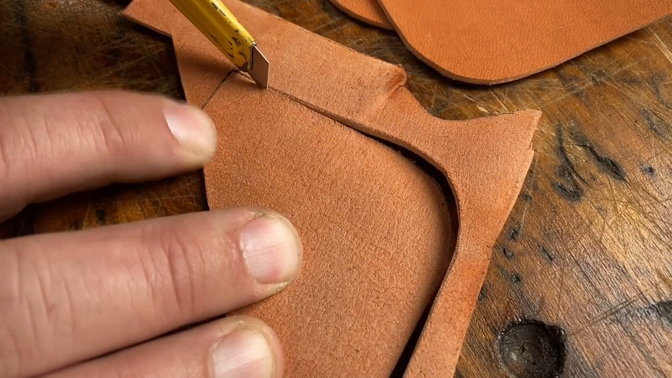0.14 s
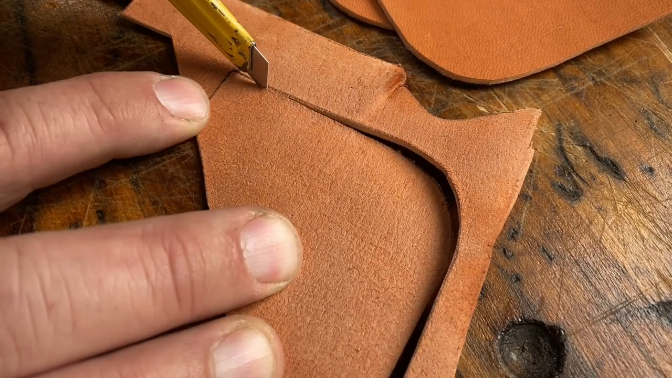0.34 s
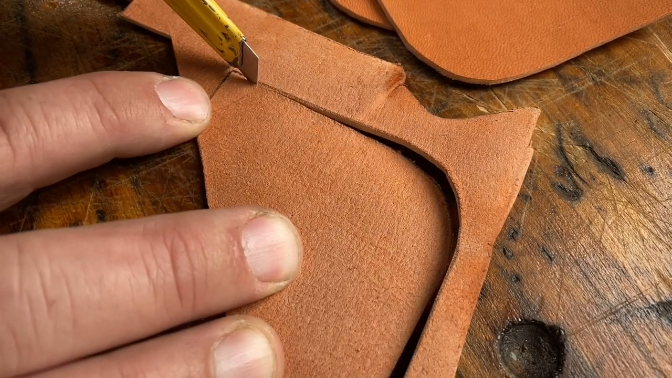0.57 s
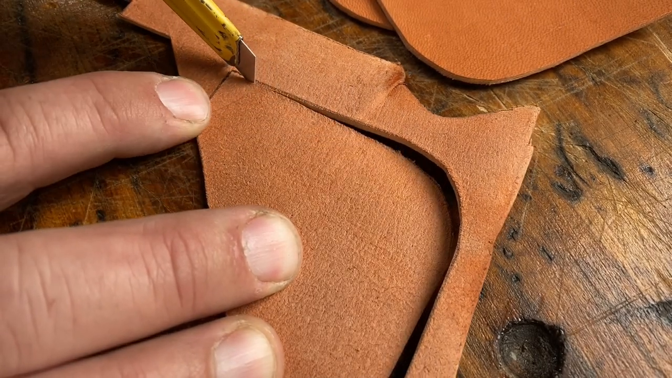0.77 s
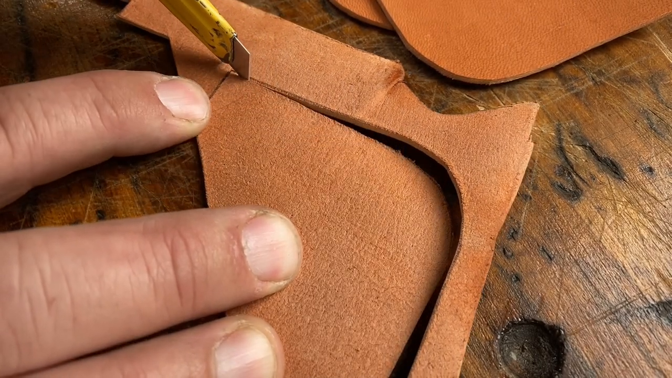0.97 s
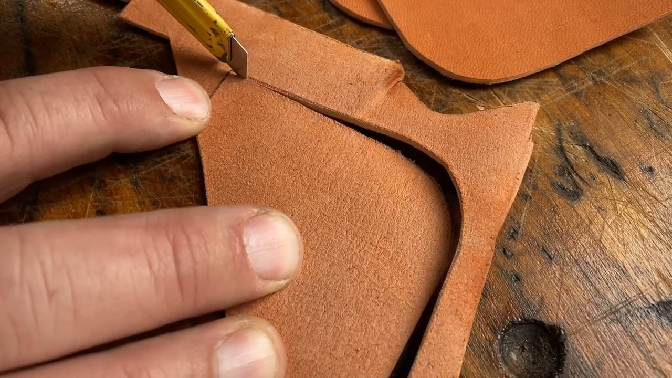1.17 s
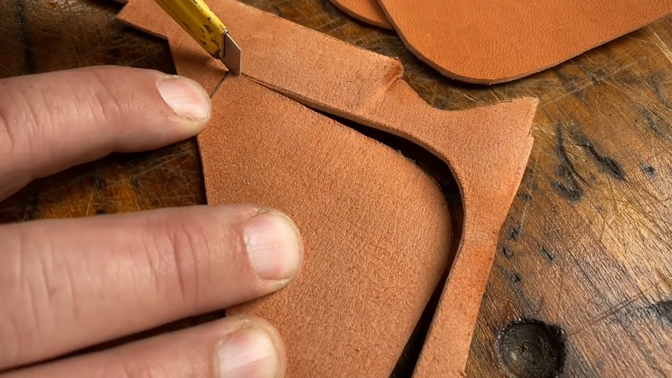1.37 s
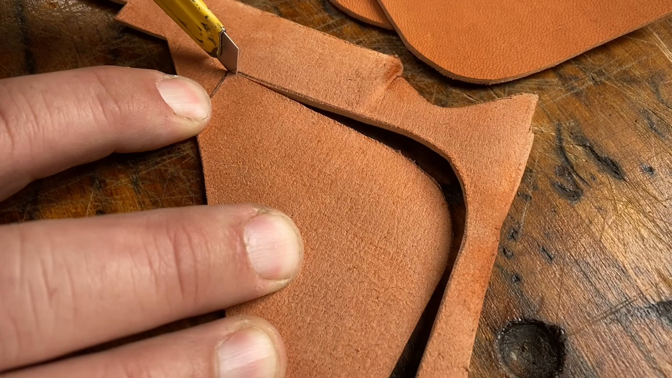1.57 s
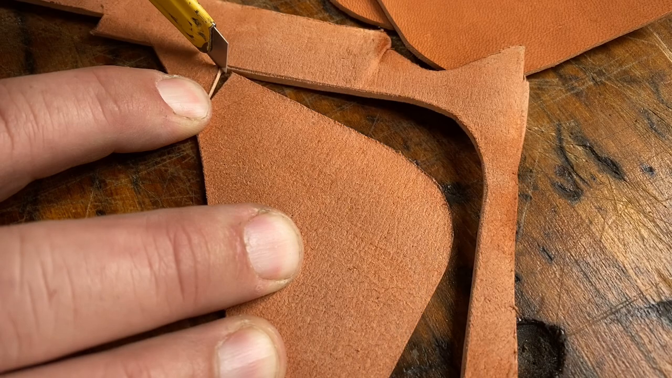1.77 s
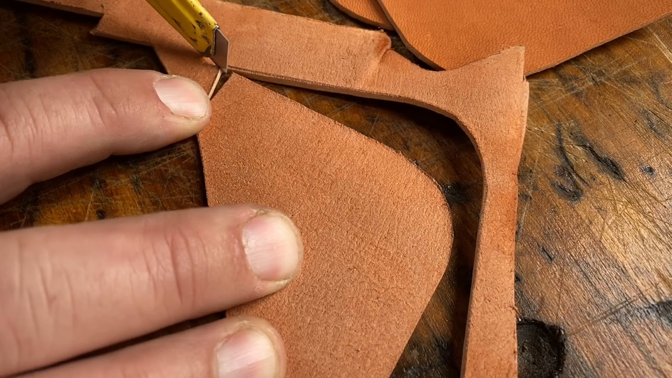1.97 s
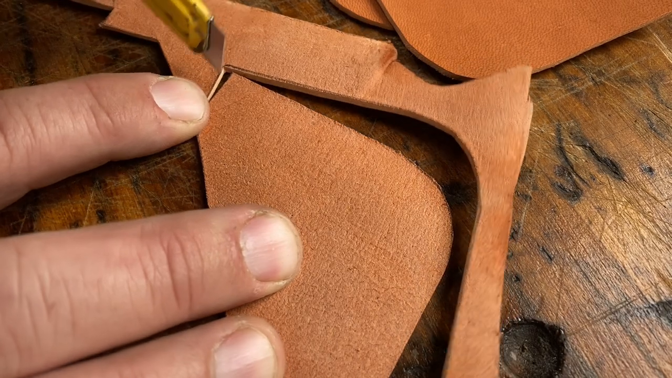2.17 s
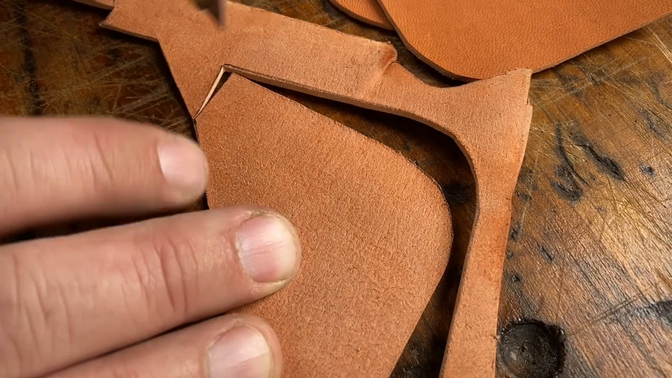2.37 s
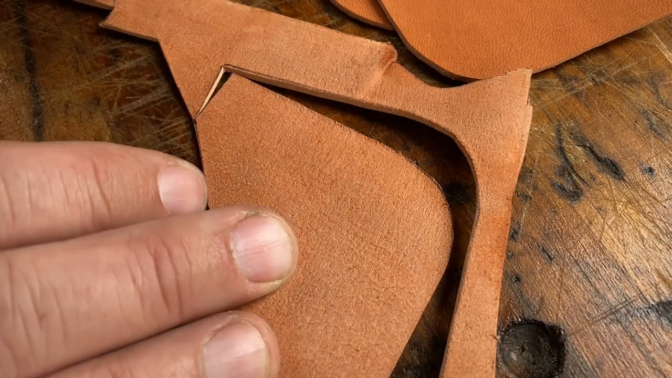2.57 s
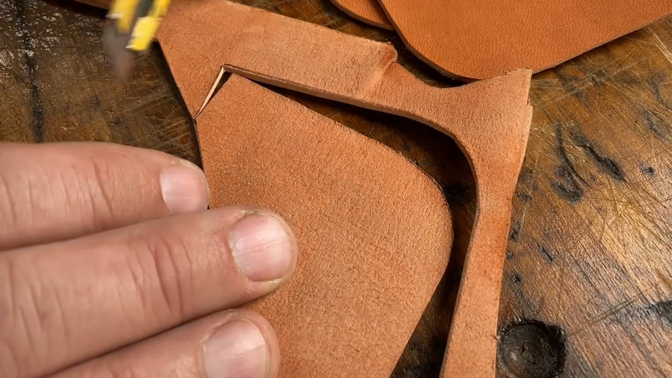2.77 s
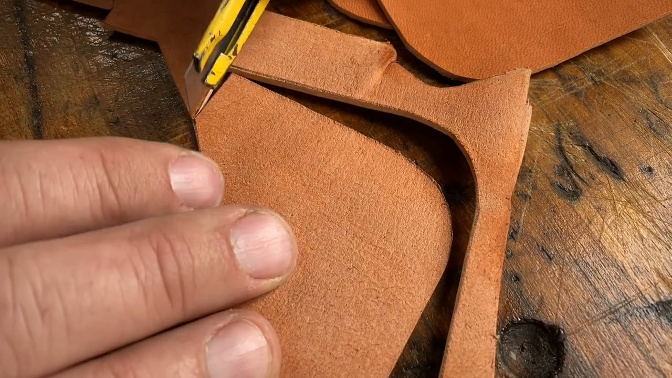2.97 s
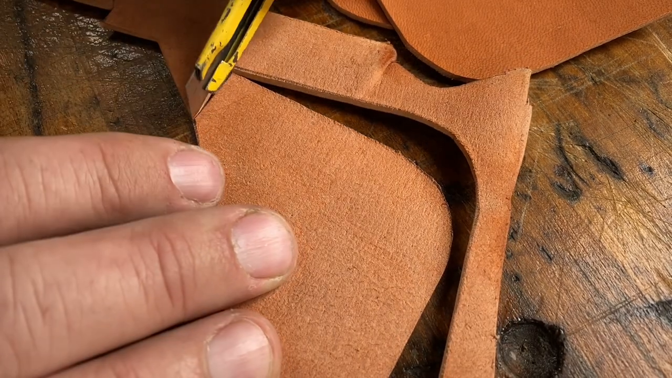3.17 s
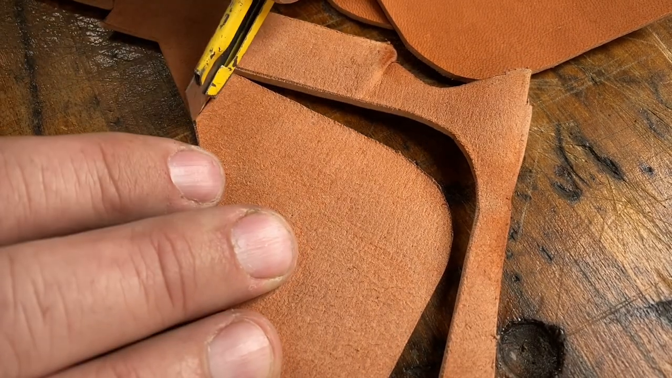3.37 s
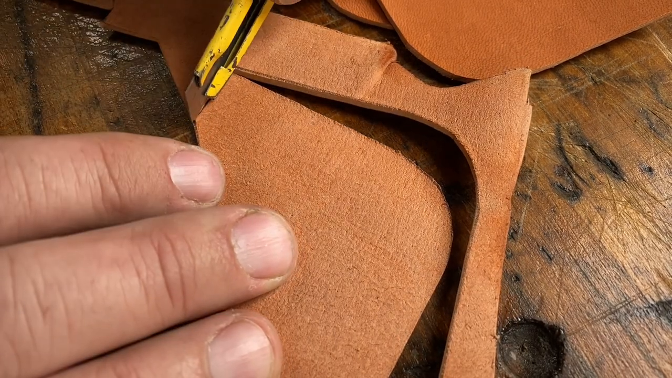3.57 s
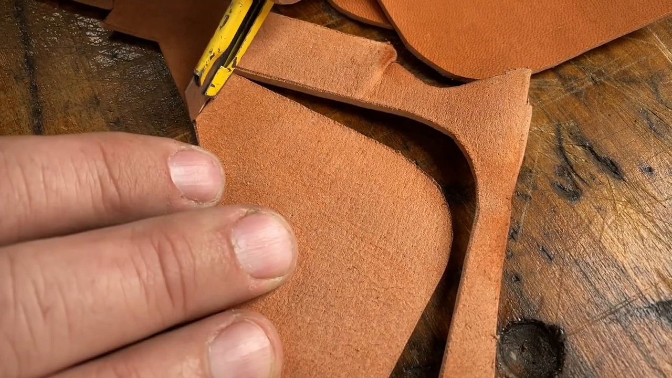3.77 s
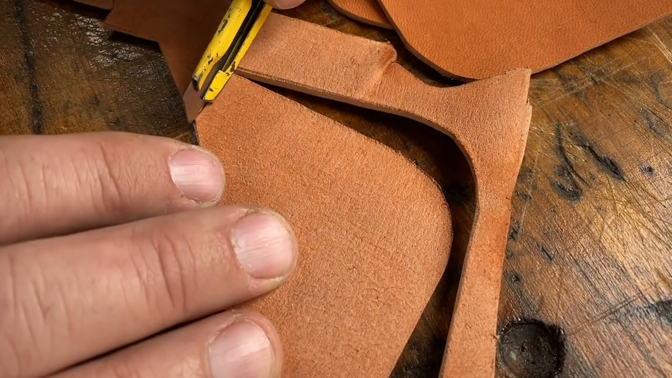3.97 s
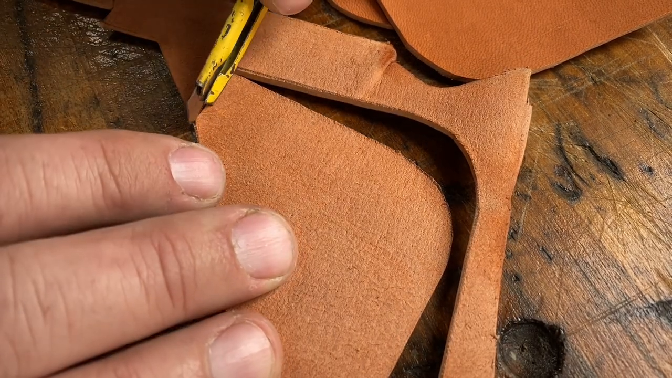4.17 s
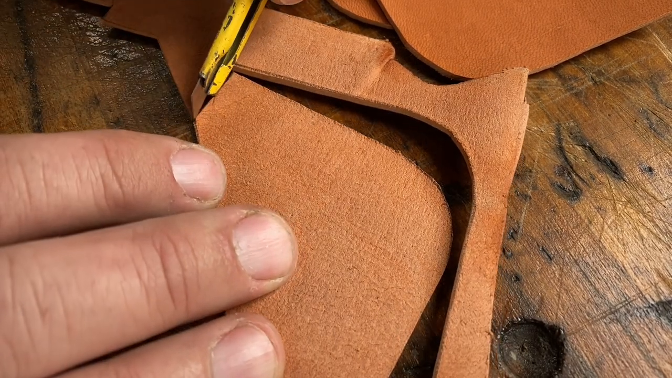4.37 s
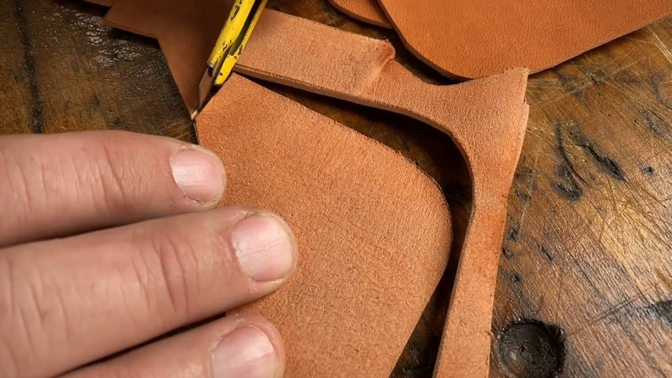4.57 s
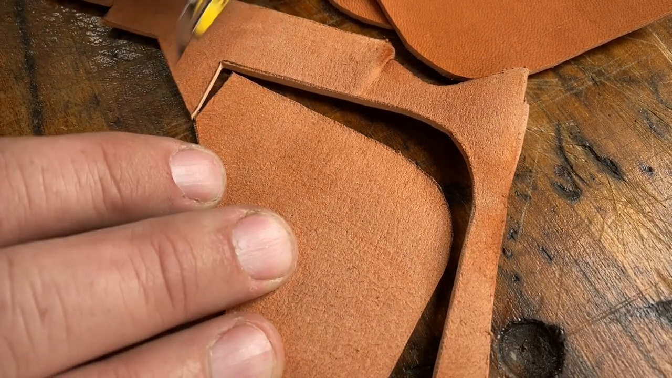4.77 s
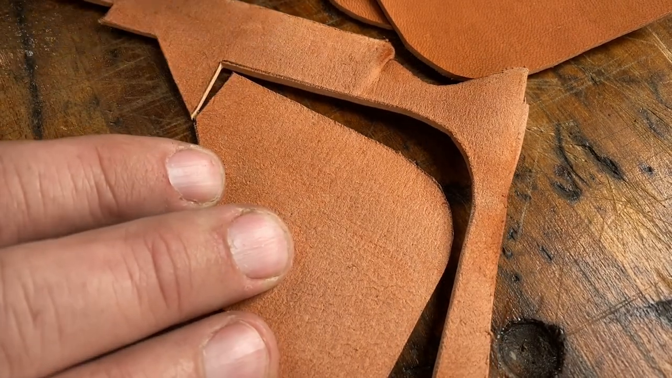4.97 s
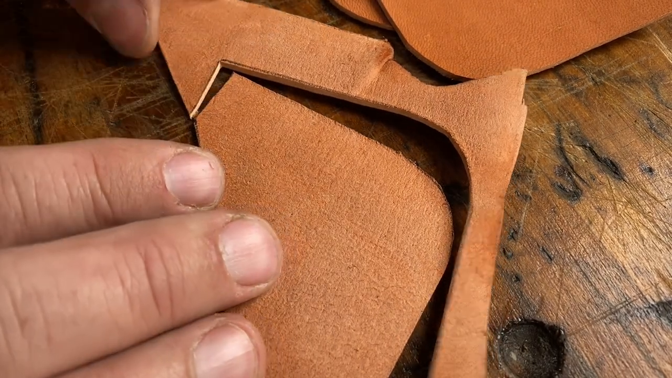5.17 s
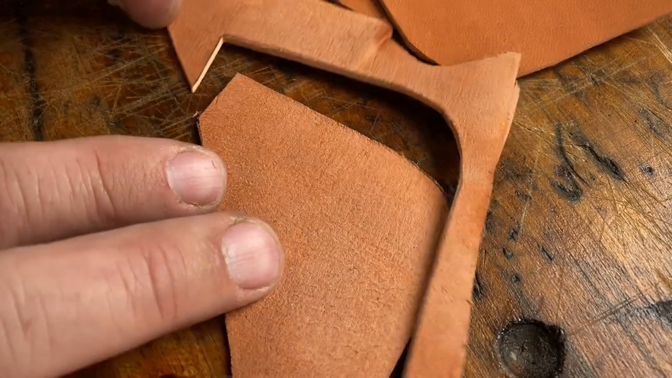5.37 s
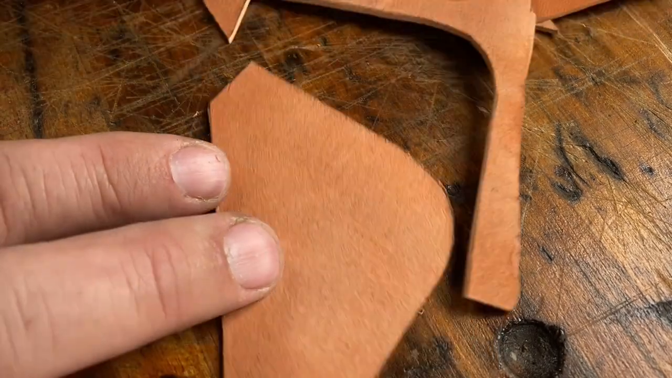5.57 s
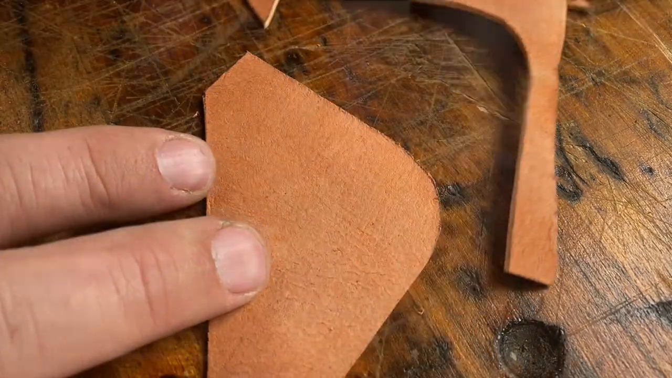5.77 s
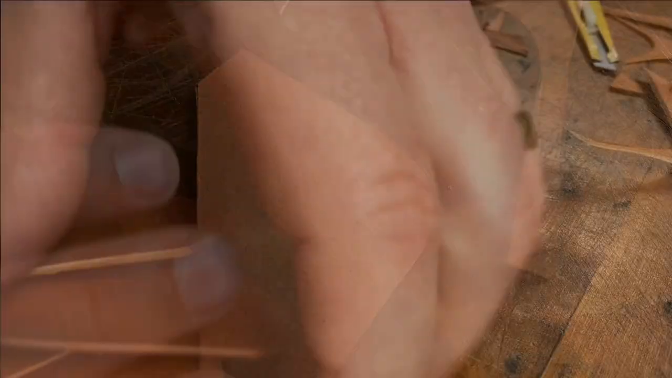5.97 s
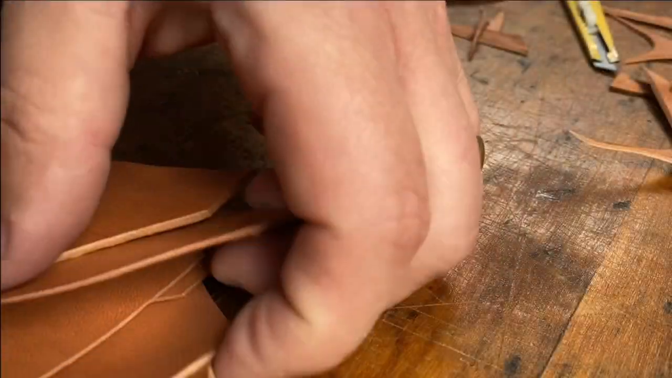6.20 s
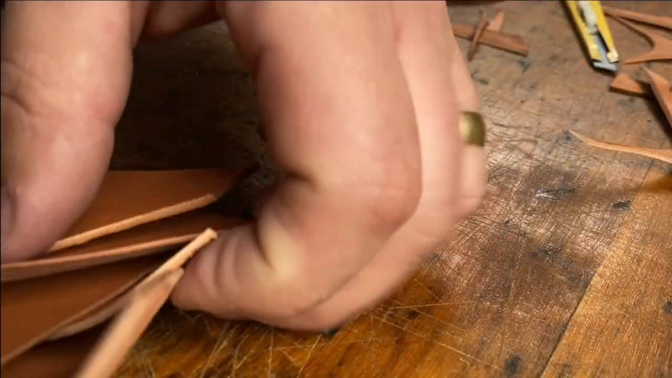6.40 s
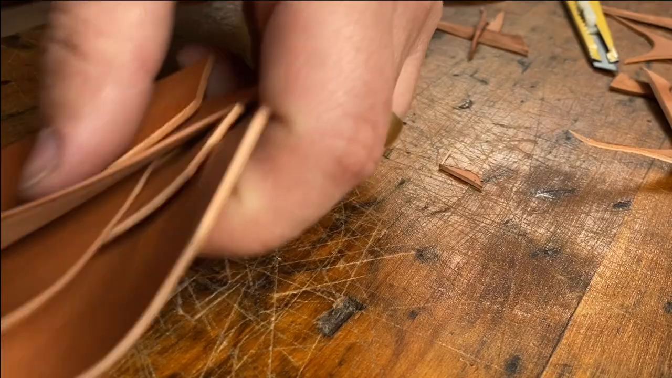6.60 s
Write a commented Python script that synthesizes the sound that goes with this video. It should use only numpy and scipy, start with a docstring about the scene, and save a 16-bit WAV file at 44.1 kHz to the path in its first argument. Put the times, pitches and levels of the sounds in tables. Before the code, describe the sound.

Short crisp knife slices through leather, a sharp tip snap, bright blade clicks and ratchet, a second cut, then leather dragged and gathered.

```python
"""Cutting leather with a snap-off knife

Short slicing strokes through leather on a wooden bench: clumped slips and snags ring the material.
The blade tip snaps through, the knife clicks as it is turned in the hand, and a second cut frees the piece;
blows ring damped modes. The offcut is dragged away and the pieces are gathered, as shaped friction noise.
A small room adds echoes and a short tail, over steady noise and a low, wavering tone.
"""
import sys
import numpy as np
from scipy import signal
from scipy.fft import rfft, irfft
from scipy.io import wavfile

SR = 44100
rng = np.random.default_rng(int(sys.argv[2]) if len(sys.argv) > 2 else 0)


def output_pcm(signal):
    """Save a mono or channel-first signal as 16-bit PCM at the path in sys.argv[1].

    Samples are clipped to [-1, 1] before scaling.
    """
    pcm = np.clip(np.atleast_2d(signal).T, -1, 1) * 32767
    wavfile.write(sys.argv[1], SR, np.round(pcm).astype(np.int16))


N = 292824
TIME = np.arange(N) / SR
LN_60_DB = np.log(1000)


def amp(db):
    """Decibels to gain."""
    return 10 ** (np.asarray(db) / 20)


def unit(x):
    """Scales to rms 1."""
    return x / np.sqrt(np.mean(x ** 2) + 1e-20)


def read(points, hz):
    """Interpolates a table on a log-frequency axis."""
    f, value = np.transpose(points)
    return np.interp(np.log(hz + 1), np.log(f + 1), value)


def add(mix, start_s, sound):
    """Mixes a sound in, in place."""
    part = mix[round(start_s * SR):][:len(sound)]
    part += sound[:len(part)]


def colour(x, spectrum, size=4096):
    """Causal minimum-phase filter with the given spectrum."""
    hz = abs(np.fft.fftfreq(size, 1 / SR))
    log_gain = np.log(amp(read(spectrum, hz)))
    response = np.exp(np.conj(signal.hilbert(log_gain)))
    taps = np.fft.ifft(response).real[:size // 2]
    return signal.fftconvolve(x, taps)[:len(x)]


def shape_noise(gain):
    """Gaussian noise of rms 1 with the given gain per FFT bin."""
    return unit(irfft(rfft(rng.standard_normal(N)) * gain, N))


def drift(rate_hz):
    """Smooth random wander of rms 1, Gaussian low-pass."""
    return shape_noise(np.exp(-(np.fft.rfftfreq(N, 1 / SR) / rate_hz) ** 2))


def band(centre_hz, width_hz):
    """Noise of rms 1 in one steep resonance."""
    f = np.fft.rfftfreq(N, 1 / SR)
    return shape_noise(1 / (1 + (2 * (f - centre_hz) / width_hz) ** 2))


def strokes(rows, stretch=1):
    """Gain of strokes that rise and fall linearly in dB around a hold; powers add."""
    power = np.zeros(N)
    for s, db, rise, hold, fall, *_ in rows:
        before = np.maximum(s - TIME, 0) / rise
        after = np.maximum(TIME - s - hold, 0) / fall
        power += amp(db - 20 * (before + after) / stretch) ** 2
    return np.sqrt(power)


SNAGS_PER_S = 25


def friction(force, spectrum, slips_per_s, spread_db, clump_db, clump_hz, smooth_db, snag_db=22):
    """Uneven tiny slips plus smooth hiss, in clumps, and random fibre snags; all ring the rubbed body."""
    size_db = spread_db * np.minimum(rng.exponential(1, N), 4)
    slips = (rng.random(N) < slips_per_s / SR) * rng.choice([-1, 1], N) * amp(size_db)
    snags = (rng.random(N) < SNAGS_PER_S / SR) * rng.uniform(-0.94, 1, N)
    rubbing = unit(slips) + amp(smooth_db) * rng.standard_normal(N)
    drive = rubbing * amp(clump_db * drift(clump_hz)) + amp(snag_db) * snags
    return force * unit(colour(drive, spectrum))


def contact(x, rows, boost_db, width, patch_db):
    """Colours a rub with a hollow and treble fizz that glide between strokes, and with shifting patches."""
    hz, t, z = signal.stft(x, SR, nperseg=512, noverlap=384)
    start, _, _, hold, _, centre_hz, fizz_db = np.transpose(rows)
    middle_s = start + hold / 2
    offset = hz[:, None] / np.interp(t, middle_s, centre_hz) - 1
    hollow = 1 / (1 + (offset / width) ** 2)  # width: half-width / centre
    treble = np.clip((hz[:, None] - 6000) / 6000, 0, 1)
    smear = np.outer(np.hanning(9), np.hanning(21))
    patches = unit(signal.fftconvolve(rng.standard_normal(z.shape), smear, "same"))
    gain_db = boost_db * hollow + treble * np.interp(t, middle_s, fizz_db) + patch_db * patches
    shaped = signal.istft(z * amp(gain_db), SR, nperseg=512, noverlap=384)[1][:N]
    return np.std(x) * unit(shaped)


def ring(modes, pitch=1, hard_db_at_10khz=0, count=2048):
    """One blow on damped modes, peak 1; a harder contact favours the high ones."""
    t = np.arange(count) / SR
    wave = np.zeros(count)
    for k, (hz, width_hz, db) in enumerate(modes):
        gain = amp(db + hard_db_at_10khz * hz / 10000) * width_hz
        decay = np.exp(-np.pi * width_hz * t)
        wave += (-1) ** k * gain * decay * np.sin(2 * np.pi * hz * pitch * t)
    return wave / abs(wave).max()


def bursts(rows, spectrum, crack_db, count=4096):
    """Each event is a one-sample crack and a decaying noise crumble."""
    out, t = np.zeros(N), np.arange(count) / SR
    for (s, db, t60), noise in zip(rows, rng.standard_normal((len(rows), count))):
        crumble = noise * np.exp(-LN_60_DB * t / t60)
        wave = colour(crumble + amp(crack_db) * (t == 0), spectrum)
        add(out, s, amp(db) * wave / abs(wave).max())
    return out


# blade pushed through leather:
# (full force at [s], level [dB], rise [s per 20 dB], hold [s], fall [s per 20 dB])
PUSHES = [(.463, -51, 0.067, .005, 0.054), (.787, -53.5, .035, .042, .018), (1.26, -66, 0.28, .03, .06),
          (1.348, -52, 0.032, .004, 0.037), (1.48, -65.5, .06, 0.036, .025), (1.627, -41, .02, .022, 0.021),
          (1.838, -57.5, .035, .004, 0.086), (4.16, -68, 0.34, .06, .08), (4.36, -43, 0.048, 0.0064, 0.017),
          (4.535, -54.5, .014, .01, .03), (4.555, -47.5, 0.033, 0.026, 0.032)]
# spectra of first cut, second cut: (frequency [Hz], relative level [dB])
FIRST_SPECTRUM = [(200, -8), (1000, -10), (3000, -13), (5000, -12), (5700, -1), (6900, -6), (7900, 3),
                  (8800, -7), (9750, -15), (10600, -2), (12100, -13), (13400, -7), (15200, -4),
                  (16000, -11)]
SECOND_SPECTRUM = [(200, -2), (1000, -17), (2600, -17), (4300, -5.5), (5000, -11), (5400, -3), (6300, -3),
                   (7200, 1), (8300, -12), (9600, -11.5), (11400, -21), (13500, -10), (16000, -14)]
LEAN_DB, LEAN_STRETCH = -20, 4  # edge leaning on the fibres: fainter, slower swell around each push
TURNED_S = 3  # knife held the other way round from here


def cutting():
    """The edge parts fibres by slips and snags, in swelling pushes."""
    force = np.hypot(strokes(PUSHES), amp(LEAN_DB) * strokes(PUSHES, LEAN_STRETCH))
    first = friction(force * (TIME < TURNED_S), FIRST_SPECTRUM, slips_per_s=5000, spread_db=3,
                     clump_db=1.8, clump_hz=140, smooth_db=-1)
    second = friction(force * (TIME >= TURNED_S), SECOND_SPECTRUM, slips_per_s=5000, spread_db=2.6,
                      clump_db=1.4, clump_hz=140, smooth_db=0)
    return first + second


# small sharp ticks and creaks while cutting, gripping and dragging: (time [s], peak [dB], T60 [s])
TICKS = [(.138, -44.5, 0.084), (.830, -41, .008), (1.87, -43, .0087), (2.757, -32.5, .008),
         (2.794, -35.5, .013), (3.640, -42, .003), (3.753, -36.5, .0047), (3.907, -36.5, 0.0073),
         (4.16, -43, 0.042), (4.21, -36.5, .02), (4.226, -35, 0.017), (4.409, -38, 0.0065),
         (4.583, -28, .007), (4.654, -39, .011), (5.043, -33.5, 0.026), (5.523, -32, .004),
         (5.552, -32, .004), (5.7706, -29, .002)]
# tick spectrum: (frequency [Hz], relative level [dB])
TICK_SPECTRUM = [(200, -6), (2500, -7.5), (4500, -2), (7000, 0.5), (10000, -5), (12500, -4.5), (14500, -2),
                 (16000, -3.5)]


def ticks():
    """Small sharp ticks and creaks: a crack and a short noise decay each."""
    return bursts(TICKS, TICK_SPECTRUM, crack_db=8.5)


# blade tip snapping through, tapping the bench:
# (time [s], peak [dB], mode frequency factor [-], hardness [dB at 10 kHz])
SNAPS = [(1.631, -15.5, 1.02, -3.5), (1.637, -29.5, .95, 0), (1.645, -30, 1.02, 2), (1.681, -36.5, 1.06, 4),
         (1.768, -42, .9, -1), (4.5827, -30, 1.14, 11), (4.8715, -25.5, 0.977, -4), (5.934, -38.5, .7, -7)]
# blade knocking in its slider: (time [s], peak [dB], mode frequency factor [-])
CLACKS = [(2.028, -48, 1.04), (2.046, -9.5, 1.046), (2.0474, -18.5, 0.92), (2.5457, -35, 1.0),
          (2.5472, -32, 0.95), (2.5487, -32, 0.9), (3.4112, -41.5, 0.633), (3.412, -32, 0.95),
          (3.412, -37, 0.73)]
# slider slipping over its teeth: (time [s], peak [dB])
TEETH = [(2.3845, -15.5), (2.3856, -19.5), (2.3867, -15), (2.3888, -23)]
# modes of tip, slider, teeth: (frequency [Hz], width [Hz], level re width [dB])
TIP_MODES = [(1000, 430, -10.5), (1934, 260, -1.5), (2390, 305, 0.5), (2880, 370, -2), (3870, 380, -5.5),
             (4620, 460, -4), (5600, 340, 2), (7500, 570, -3), (8740, 540, -6.5), (10200, 900, -11),
             (13200, 800, -10), (14970, 520, -10)]
SLIDER_MODES = [(700, 900, -17.5), (1410, 780, -18), (3000, 300, -16.5), (3900, 120, -6.5),
                (4470, 220, -9.5), (5460, 170, -11), (6280, 290, 0), (7090, 600, 0), (7680, 520, 1.5),
                (7990, 430, -2), (11900, 700, -14), (13500, 1200, -19)]
TOOTH_MODES = [(1920, 1260, -15.5), (3700, 190, -6), (4420, 320, -4), (4910, 310, 2), (5760, 340, -4),
               (6990, 290, 2), (8770, 260, 1), (9600, 470, -7), (11360, 550, -11), (12400, 330, -7),
               (13350, 340, -1.5), (14100, 250, -7), (15350, 440, -9)]
# loose handle parts buzzing after a blow: (time [s], peak [dB], T60 [s])
BUZZES = [(2.048, -36, 0.15), (2.088, -42.5, .06), (2.389, -32.5, .16), (3.414, -45, 0.089)]
# fingers shifting on the handle: (full force at [s], level [dB], rise [s per 20 dB], hold [s],
# fall [s per 20 dB], resonance of hollow under hand [Hz], fizz from 12 kHz up [dB])
GRIPS = [(2.188, -69, .15, 0.052, .1, 5200, 11), (2.325, -56.5, 0.12, .03, .1, 3080, 8),
         (2.422, -55, .08, 0.057, .04, 3700, 4), (2.547, -42.5, 0.0033, .003, .005, 6500, 8),
         (2.632, -47, 0.012, 0.018, .035, 5600, 4.5), (2.72, -54, .1, .008, .04, 4970, 0),
         (2.757, -50, .025, .004, .02, 5500, 1), (2.793, -56, 0.027, .004, 0.028, 5600, 8),
         (2.85, -66.5, .15, .03, .15, 6000, 3), (2.926, -59.5, .06, .004, 0.036, 3880, 4),
         (2.972, -61, .05, .004, .05, 7050, 10)]
# handle spectrum: (frequency [Hz], relative level [dB])
GRIP_SPECTRUM = [(300, -25), (2000, -23.5), (3200, -12), (3900, -2.5), (5700, -2.5), (6900, -4), (8000, -6),
                 (9000, -10), (11500, -16), (14000, -15.5), (16000, -13)]


def knife():
    """Tip, loose blade and slider teeth ring as struck modes; fingers rub and loose parts buzz."""
    rub = friction(strokes(GRIPS), GRIP_SPECTRUM, slips_per_s=3000, spread_db=3.2,
                   clump_db=1.7, clump_hz=170, smooth_db=-1)
    out = contact(rub, GRIPS, boost_db=7.5, width=.12, patch_db=3)
    out += bursts(BUZZES, GRIP_SPECTRUM, crack_db=0, count=8192)
    for s, db, pitch, hard_db in SNAPS:
        add(out, s, amp(db) * ring(TIP_MODES, pitch, hard_db))
    for s, db, pitch in CLACKS:
        add(out, s, amp(db) * ring(SLIDER_MODES, pitch))
    for s, db in TEETH:
        add(out, s, amp(db) * ring(TOOTH_MODES))
    return out


# offcut nudged and pulled over the bench; pieces gathered, leather on leather and skin:
# (full force at [s], level [dB], rise [s per 20 dB], hold [s], fall [s per 20 dB],
# resonance [Hz], fizz from 12 kHz up [dB])
DRAGS = [(4.652, -48.5, .008, .003, 0.028, 3970, -2), (4.698, -57, .08, 0.018, 0.19, 3700, -2),
         (4.905, -58, 0.11, 0.043, .08, 3700, -2), (5.0, -62.5, .1, .13, .15, 5270, 0),
         (5.227, -55.5, .1, 0.12, .08, 5200, -3.5), (5.396, -49.5, 0.056, 0.083, .08, 3360, 2),
         (5.52, -42.5, .07, .018, 0.1, 3520, 0), (5.622, -54.5, .1, 0.067, .1, 3330, 1),
         (5.741, -46, .09, 0.046, .09, 5100, -0.5)]
GATHERS = [(5.93, -62, .1, 0.034, .08, 2000, -5), (5.996, -49.5, .035, .005, 0.064, 4550, 1.5),
           (6.087, -55.5, 0.13, 0.072, .12, 4440, 5), (6.228, -54, .12, .008, .1, 2690, -1.5),
           (6.312, -45, .03, .008, 0.039, 3720, -1), (6.36, -59.5, .05, .04, .05, 3600, 1),
           (6.417, -47, .016, .035, 0.22, 3200, -1.5), (6.556, -50, .02, .008, .08, 4200, 2),
           (6.613, -53, .1, .03, .1, 6000, 0.5)]
# piece edges flapping together: (time [s], peak [dB], T60 [s])
FLAPS = [(6.279, -32.5, .022), (6.2902, -27.5, .015), (6.299, -30.5, 0.016), (6.3062, -29.5, 0.02),
         (6.419, -38.5, .025), (6.547, -35.5, .015)]
# spectra of drag, gather, flaps: (frequency [Hz], relative level [dB])
DRAG_SPECTRUM = [(200, -7), (700, -4), (1600, -10), (2800, -6), (3450, -2), (4200, -3.5), (5400, 0),
                 (6800, -1.5), (8100, -2), (9300, -7), (11000, -7), (14300, -3), (16000, -8)]
GATHER_SPECTRUM = [(200, -7.5), (700, -3), (1900, -6), (2600, -1), (3600, -3), (6000, -3), (8000, -7),
                   (10800, -14), (13500, -8.5), (16000, -12)]
FLAP_SPECTRUM = [(120, -43), (200, -11), (394, -1), (590, -6), (850, 1.5), (1400, -14.5), (1980, -5),
                 (2560, -10), (2910, -5), (3430, -14), (5420, -5.5), (7410, -16.5), (16000, -27)]


def leather():
    """The offcut's rough side slips over wood; pieces rub and flap together."""
    drag = friction(strokes(DRAGS), DRAG_SPECTRUM, slips_per_s=2500, spread_db=3.7,
                    clump_db=1.7, clump_hz=200, smooth_db=-1)
    gather = friction(strokes(GATHERS), GATHER_SPECTRUM, slips_per_s=3000, spread_db=3,
                      clump_db=1.5, clump_hz=160, smooth_db=0)
    drag = contact(drag, DRAGS, boost_db=4, width=0.081, patch_db=1.4)
    gather = contact(gather, GATHERS, boost_db=3.5, width=0.13, patch_db=2.5)
    return drag + gather + bursts(FLAPS, FLAP_SPECTRUM, crack_db=5.0)


# dull scuffs of hand and pieces: (centre time [s], level [dB], length [s], centre frequency [Hz])
SCUFFS = [(0.466, -54.5, 0.015, 477), (1.654, -54, 0.036, 577), (1.784, -49, .09, 105),
          (4.197, -51.5, 0.093, 105), (4.219, -58.5, .03, 480), (4.355, -58.5, 0.043, 520),
          (4.59, -52, 0.029, 520), (4.6, -46.5, .04, 109), (5.122, -53, 0.032, 413),
          (5.919, -56, 0.018, 520), (5.968, -55.5, .045, 720), (6.143, -50, 0.06, 673),
          (6.37, -50.5, .1, 100)]
# soft knocks: (time [s], level [dB], hardness [dB per octave])
KNOCKS = [(.464, -44, -2.5), (1.631, -44.5, -2), (1.717, -44, -14), (1.838, -54, -2), (1.87, -49.5, -2),
          (2.045, -46.5, 12), (3.412, -47.5, -3), (4.583, -45.5, -7)]
# bench top modes: (frequency [Hz], T60 [s], level [dB])
BENCH_MODES = [(124, 0.11, -5.5), (302.4, 0.054, 0.5), (502, .06, -7.5)]
SCUFF_WIDTH = 1.15  # bandwidth / centre


def bench(grain_db=2.9, slide_db=-61, slide_hz=470, slide_width_hz=650, follow=0.65):
    """The heavy top murmurs under sliding leather, with grainy scuffs and low knocks on damped modes."""
    t = np.arange(SR // 4) / SR
    slide = strokes(DRAGS + GATHERS)
    out = amp(slide_db) * (slide / slide.max()) ** follow * band(slide_hz, slide_width_hz)
    for s, db, length, hz in SCUFFS:
        out += amp(db) * band(hz, SCUFF_WIDTH * hz) * np.exp(-2 * ((TIME - s) / length) ** 2)
    out *= unit(amp(grain_db * drift(110)))
    onset = 1 - np.exp(-t / 0.00075)
    for s, db, hard_db in KNOCKS:
        for hz, t60, mode_db in BENCH_MODES:
            octaves = np.log2(hz / BENCH_MODES[1][0])
            decay = np.exp(-LN_60_DB * t / t60)
            add(out, s, amp(db + mode_db + hard_db * octaves) * np.sin(2 * np.pi * hz * t) * decay * onset)
    return out


# tail decay: (frequency [Hz], T60 [s])
ROOM_T60 = [(200, 0.27), (2000, 0.27), (6000, 0.24), (15000, 0.063)]
# nearby surfaces: (delay [s], level [dB])
ECHOES = [(.0065, -29.5), (.0095, -24.5), (.013, -22.5), (.046, -27)]


def room(x, wet_db=-18):
    """A few close echoes and a short diffuse tail that decays per frequency."""
    hz, t, z = signal.stft(rng.standard_normal(SR // 2), SR, nperseg=256)
    decay = np.exp(-LN_60_DB * t / read(ROOM_T60, hz)[:, None])
    tail = signal.istft(z * decay, SR)[1]
    tail *= np.minimum(np.arange(len(tail)) / SR / 0.0033, 1)  # 3.3 ms fade-in
    tail *= amp(wet_db) / np.linalg.norm(tail)
    for delay_s, db in ECHOES:
        add(tail, delay_s, amp([db]))
    return x + signal.fftconvolve(x, tail)[:N]


# steady noise spectrum: (frequency [Hz], relative level [dB])
FLOOR_SPECTRUM = [(12, 1.5), (25, 8), (38, 3.5), (52, 3.5), (80, -4), (115, -1.5), (170, -11.5),
                  (300, -16.5), (600, -24), (1500, -29), (4000, -35), (8000, -39.5), (12000, -44),
                  (16000, -47)]
# rumble: (time [s], level relative to RUMBLE_LEVEL_DB [dB])
RUMBLE = [(0.0, -43), (0.37, -35.5), (0.63, -47.5), (1.14, -51), (1.85, -30), (2.12, -43), (2.83, -45),
          (2.94, -61), (3.01, -43.5), (3.72, -60), (3.94, -42), (4.36, -52), (4.44, -35), (4.57, -43.5),
          (5.69, -44), (5.79, -63), (6.12, -38), (6.64, -40)]
RUMBLE_LEVEL_DB = -0.5  # overall level of the rumble


def background(floor_db=-49, rumble_hz=25.3, waver_hz=1.19):
    """Steady shaped noise and a deep tone of wavering frequency and level."""
    floor = shape_noise(amp(read(FLOOR_SPECTRUM, np.fft.rfftfreq(N, 1 / SR))))
    frequency_hz = rumble_hz + waver_hz * drift(8.2)
    rumble = unit(np.sin(2 * np.pi * np.cumsum(frequency_hz) / SR))
    s, db = np.transpose(RUMBLE)
    return amp(floor_db) * floor + amp(RUMBLE_LEVEL_DB + np.interp(TIME, s, db)) * rumble


def scene():
    """All bench sources heard in the room, plus background; one channel."""
    dry_sources = cutting() + ticks() + knife() + leather() + bench()
    return (room(dry_sources) + background())[None]


EDGE_HZ = 15950


def record(dry):
    """The recorder's band limit: linear-phase low-pass."""
    taps = signal.firwin(401, EDGE_HZ, window=("kaiser", 9), fs=SR)
    return signal.oaconvolve(dry, taps[None], "same")


dry = scene()
out = record(dry)
output_pcm(out)
```